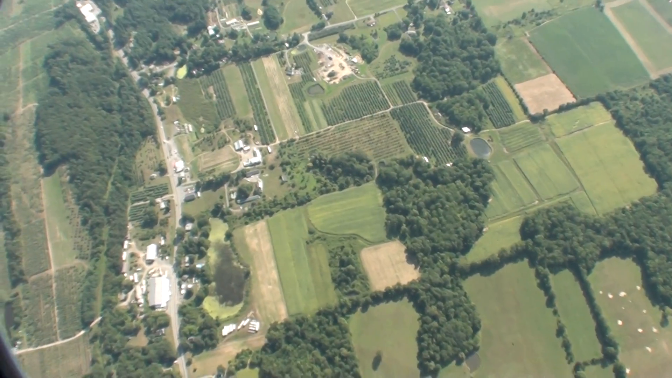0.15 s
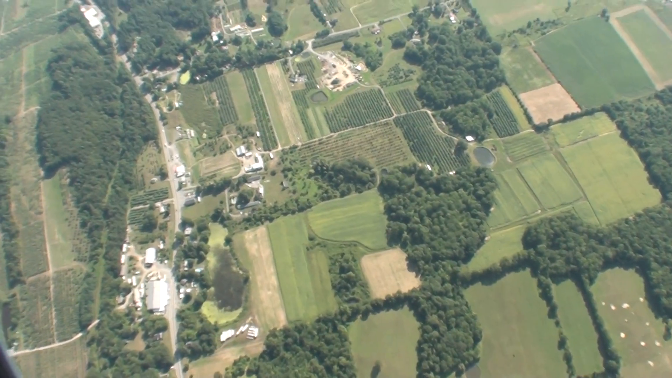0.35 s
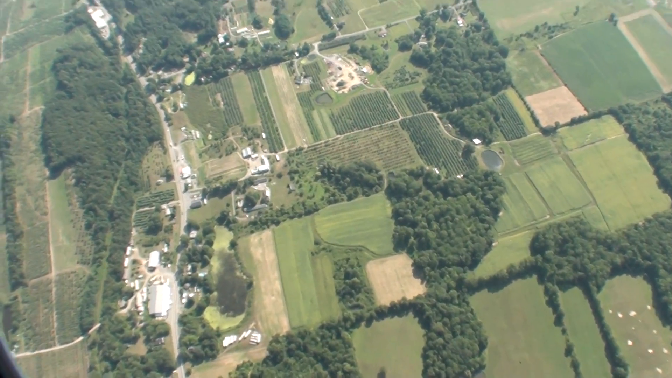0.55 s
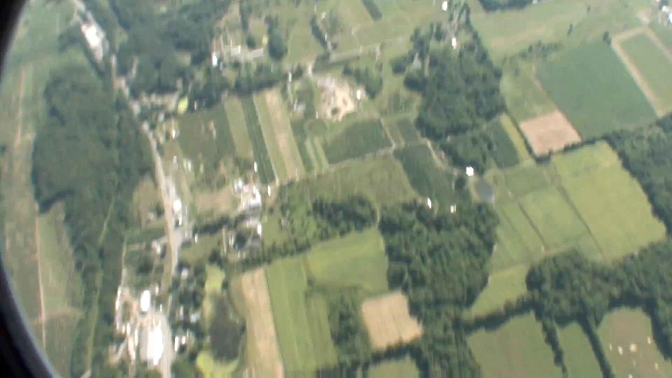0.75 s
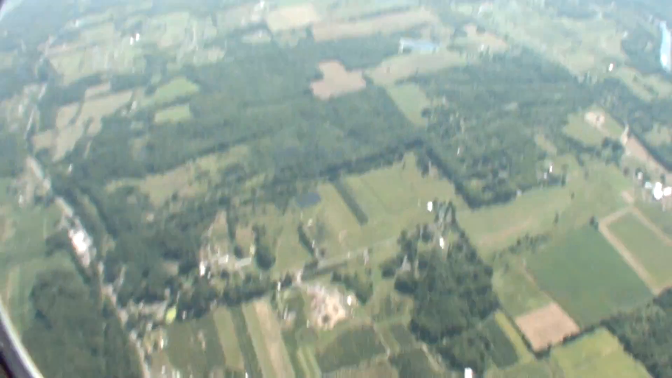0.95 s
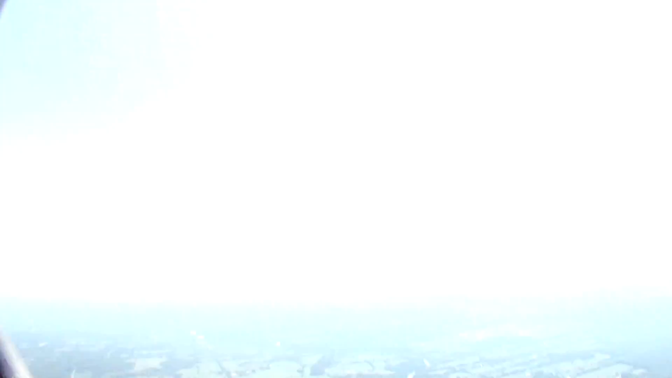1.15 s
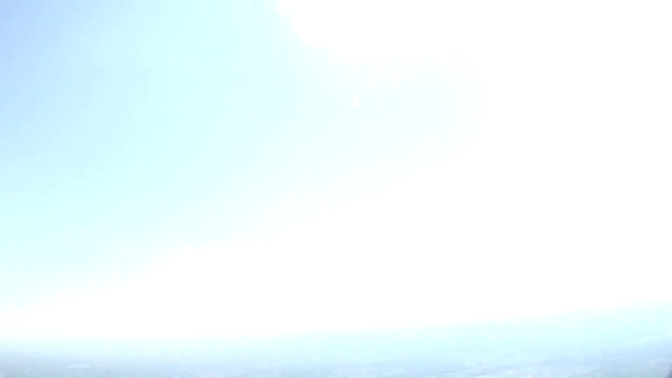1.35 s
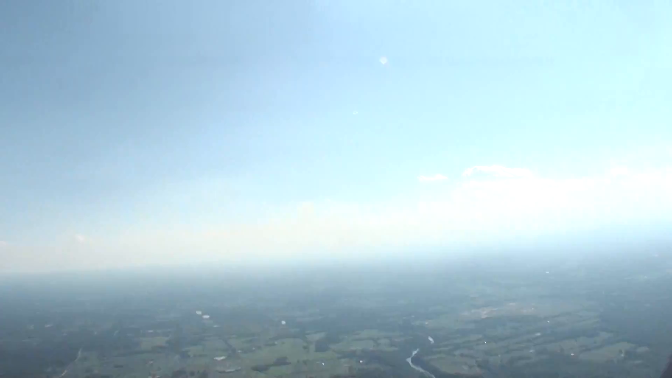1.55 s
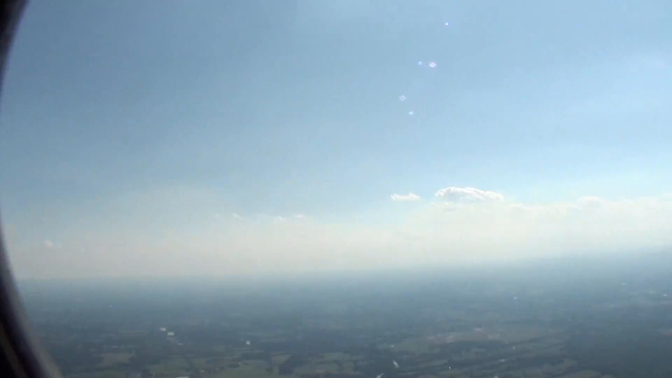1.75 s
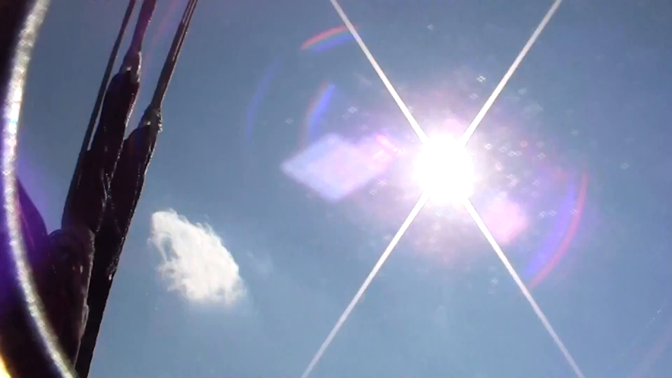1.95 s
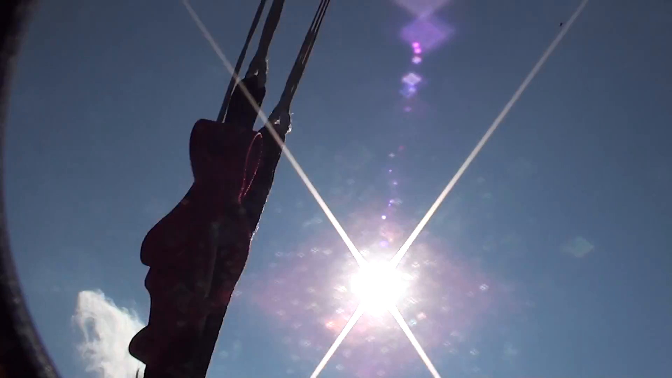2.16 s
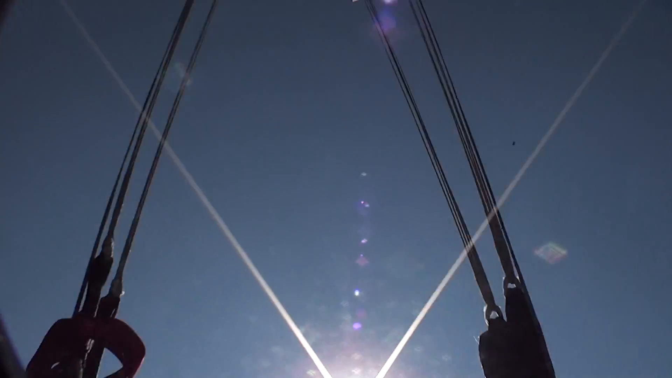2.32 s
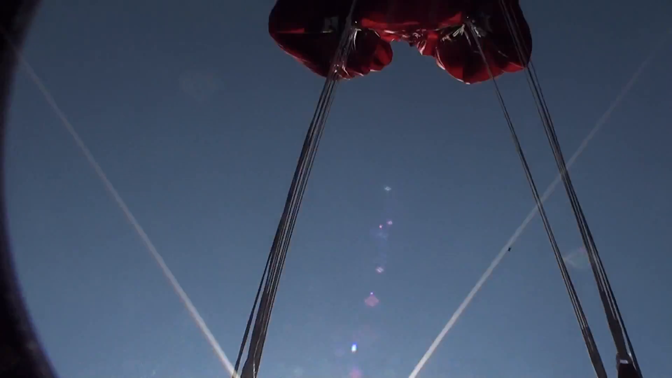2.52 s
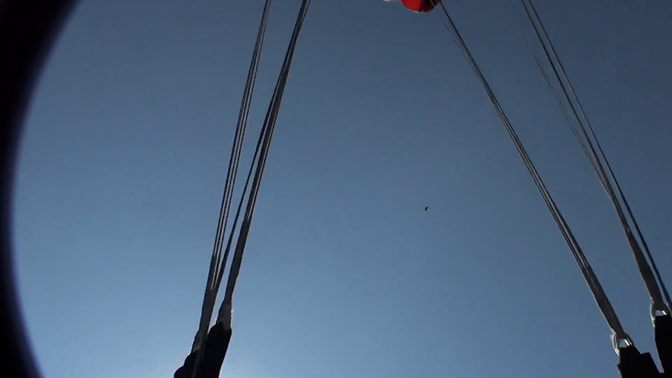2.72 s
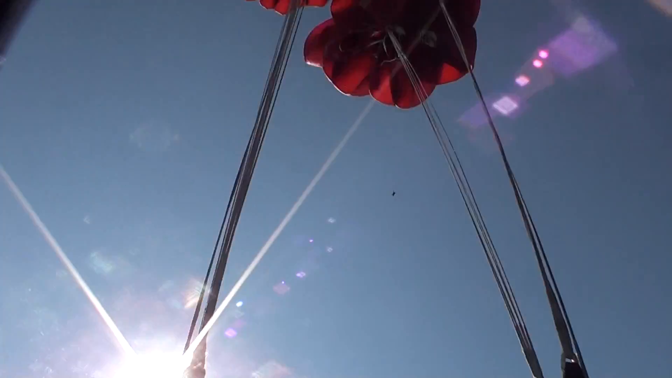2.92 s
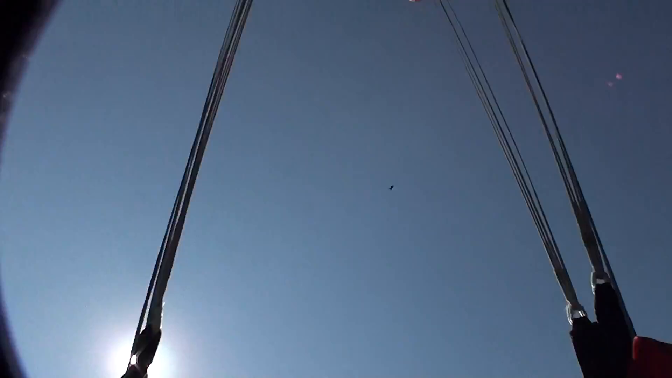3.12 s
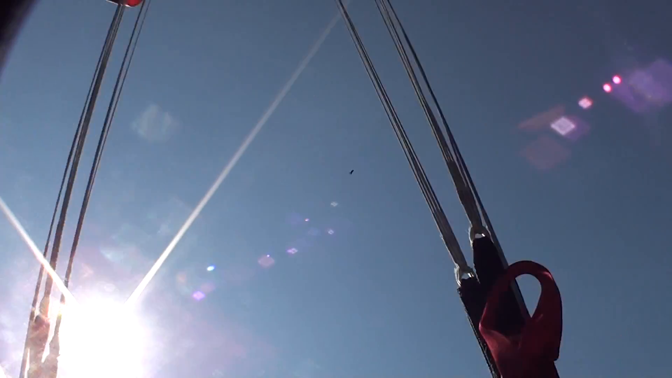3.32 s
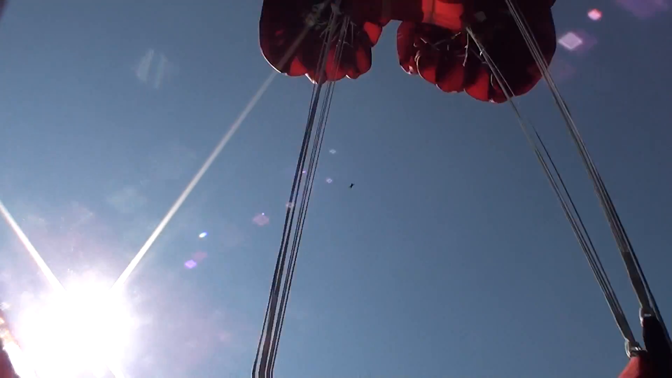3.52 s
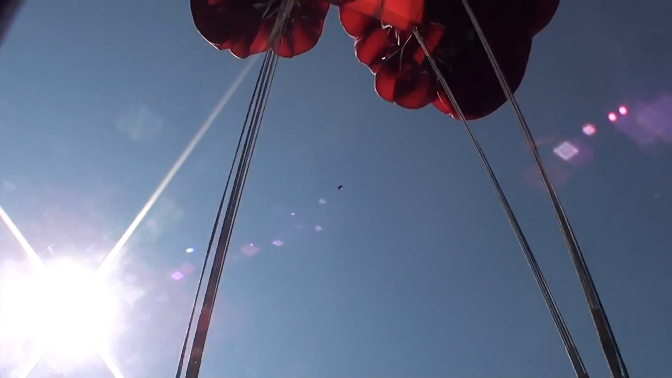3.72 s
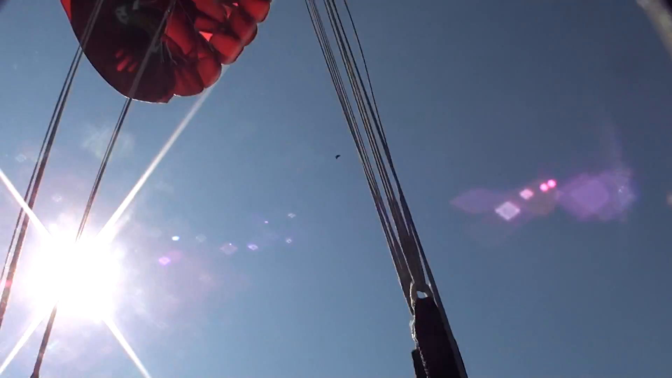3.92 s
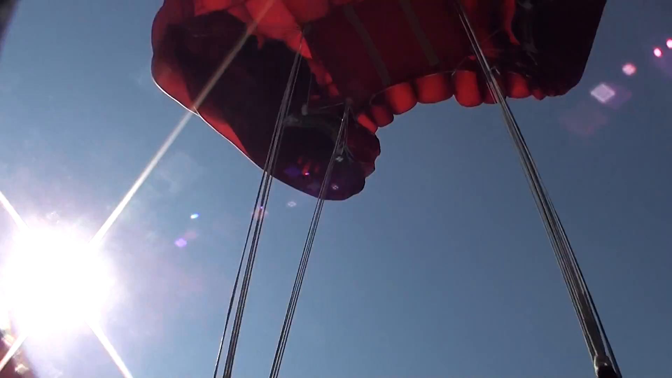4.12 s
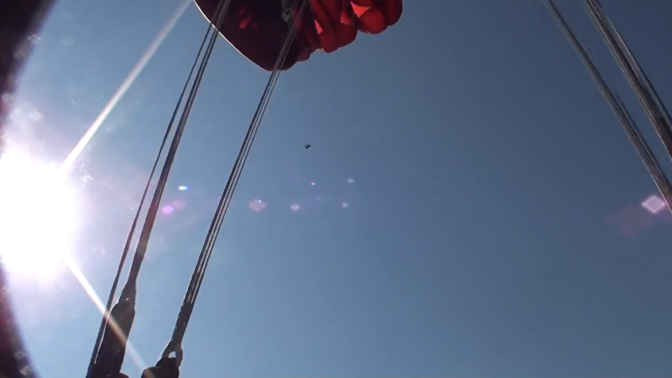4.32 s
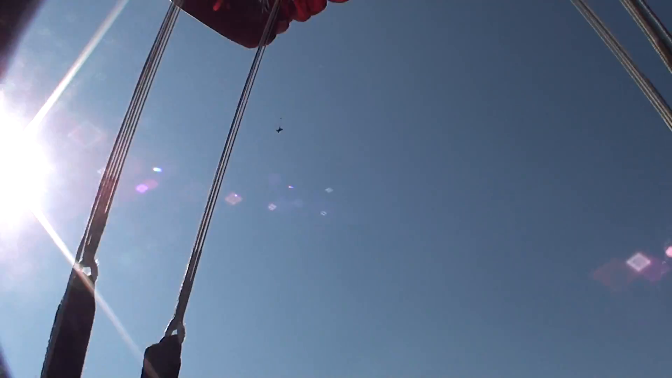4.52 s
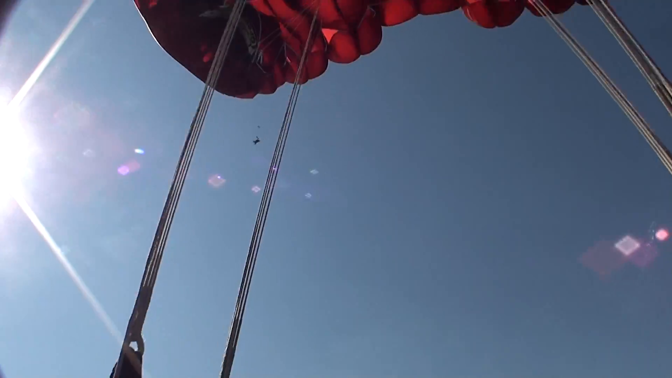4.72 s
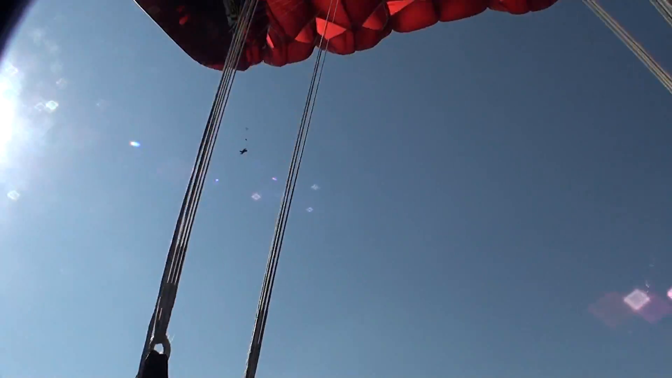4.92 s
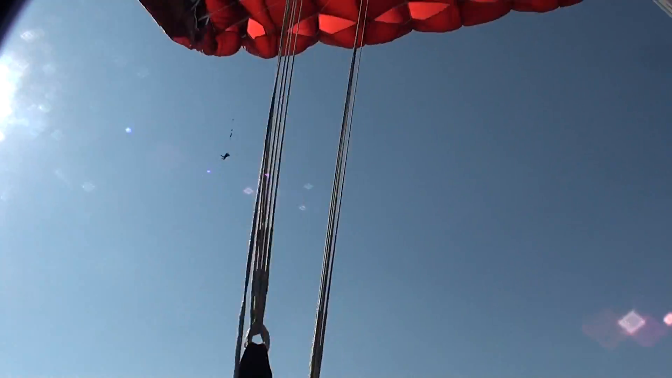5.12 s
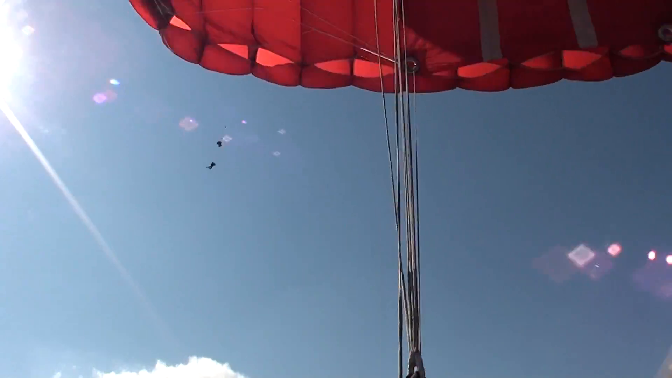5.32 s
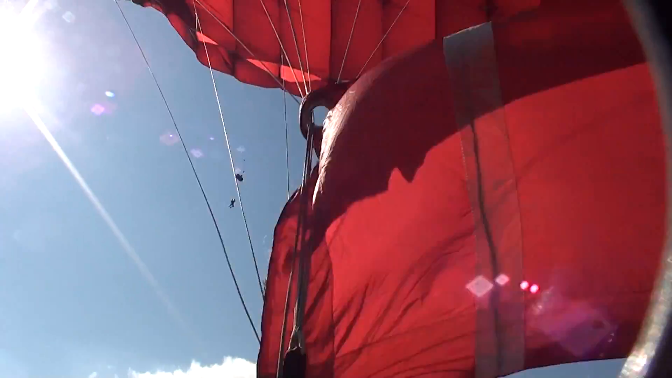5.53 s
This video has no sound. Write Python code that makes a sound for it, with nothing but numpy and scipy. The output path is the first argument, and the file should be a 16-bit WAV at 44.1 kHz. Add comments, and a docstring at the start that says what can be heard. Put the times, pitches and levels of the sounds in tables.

```python
"""Freefall and an opening parachute

Air roars and hisses over a skydiver's camera, then tears and spits as the body swings upright.
The opening parachute slows the fall, and the roar sinks to uneven thuds from eddies (swirls of air).
Overhead the canopy flutters and snaps, its lines tick, and the cloth slider rasps down them.
All this is heard through the camera's two microphone openings, called ports."""
import sys
import numpy as np
from scipy import signal
from scipy.fft import rfft, irfft, next_fast_len
from scipy.io import wavfile
from scipy.ndimage import map_coordinates

SR = 44100
rng = np.random.default_rng(int(sys.argv[2]) if len(sys.argv) > 2 else 0)


def bounce(signal):
    """Save signal as a 16-bit WAV file at the path given by the first command-line argument."""
    frames = np.transpose(np.atleast_2d(signal))
    limited = np.clip(frames, -1, 1)
    pcm = np.round(limited * 32767).astype(np.int16)
    wavfile.write(sys.argv[1], SR, pcm)


N = 245637

# Levels in these tables are relative: the functions add their own gains.
# Clear ticks of lines and seams. Each row: start in seconds, level in dB, length in seconds.
LINE_TICKS = [(2.108, -30, .003), (2.61, -27, .003), (2.625, -30, 0.0038), (2.665, -33, .004),
              (2.687, -31, .003), (3.312, -30, .002), (3.445, -26, 0.0033), (3.693, -28.5, .003)]
# Jerks of the slider. Each row: time in seconds, level in dB, half-width in seconds, pitch in Hz.
SLIDER_JERKS = [(2.43, -30, .007, 2000), (3.402, -31.5, 0.012, 2600), (4.088, -31.5, .018, 2600),
                (4.15, -32, .012, 2400), (5.262, -34.5, .003, 2400), (5.272, -31.5, .006, 2000),
                (5.406, -34, .006, 2700), (5.422, -36, .003, 2700), (5.452, -32.5, 0.015, 2000),
                (5.56, -31.5, 0.017, 2300)]
# The canopy's flutter, strongest as it billows open. Each row: time in seconds, level in dB.
FLUTTER_LEVELS = [(1.9, -37.5), (2.4, -38.5), (2.85, -41), (3.42, -39), (3.92, -38.5), (4.1, -32.5),
                  (4.44, -43.5), (4.82, -43.5), (5.17, -45), (5.57, -40)]
# Cloth snapping tight. Each row: start in seconds, snap in dB, sizzle in dB, length in seconds.
CLOTH_SNAPS = [(2.005, -23, -46, .013), (2.184, -22, -40, .008), (2.298, -22, -47, 0.021),
               (2.493, -24, -51, 0.0098), (2.803, -19, -45, .008), (2.927, -20.5, -51, .011),
               (3.262, -25, -56, 0.0086), (3.348, -23, -41.5, .005), (3.53, -30, -59, 0.011),
               (3.988, -17, -46, .006), (4.046, -14, -50, 0.01), (4.265, -16, -48, 0.014),
               (4.57, -22, -48, .007), (5.037, -22.5, -53.5, 0.019), (5.4495, -14, -54, 0.0054),
               (5.541, -17, -57, 0.007), (5.562, -16, -53, 0.0069)]
# Sharp spits of torn air. Each row: start in seconds, level in dB, length in seconds.
AIR_SPITS = [(1.057, -21, 0.0024), (1.081, -13, .001), (1.11, -19, 0.0017), (1.128, -21, .003),
             (1.133, -10.5, 0.0019), (1.152, -24, .003), (1.158, -26, .003), (1.169, -25, 0.0043),
             (1.18, -15.5, .005), (1.186, -23, .003), (1.211, -29, .002), (1.222, -33, 0.0027),
             (1.286, -28, .003), (1.305, -18.5, .0025), (1.317, -23, 0.0018), (1.42, -28, .003),
             (1.435, -17, 0.0022), (1.5515, -20, .004), (1.563, -19, .002), (1.569, -16, .002),
             (1.585, -21, .003), (1.597, -25, .003), (1.639, -17, .0018), (1.663, -24, .003),
             (1.672, -29, .002), (1.679, -21, .0013), (1.708, -35, .002), (1.737, -20, 0.0018),
             (1.791, -22, 0.0015), (1.81, -35, .003), (1.831, -29, .003), (1.844, -21, 0.0038),
             (1.863, -26, .005), (1.873, -25, .005), (1.896, -22, .004), (1.908, -27, .003)]
# Big swirls passing by. Each row: time in seconds, level in dB, pitch in Hz, half-width in seconds.
SWIRL_THROBS = [(1.263, -18, 106, 0.0099), (1.446, -24, 155, 0.019), (1.55, -15.5, 177, 0.0067),
                (1.724, -13, 126, 0.012), (1.852, -11, 140, 0.013), (2.419, -12.5, 120, 0.014),
                (2.642, -17, 117, 0.017), (2.675, -16, 142, 0.0063), (2.704, -16, 136, 0.0098),
                (2.764, -11.5, 133, 0.0091), (2.798, -16, 170, 0.0084), (2.881, -11, 116, 0.013),
                (3.041, -18.5, 135, 0.0077), (3.192, -15.5, 124, 0.0083), (3.284, -18, 85, .009),
                (3.504, -17, 84, 0.015), (3.567, -17, 101, 0.0069), (3.886, -22, 104, 0.015),
                (3.979, -21, 106, 0.02), (4.119, -21, 132, .014), (4.443, -35, 139, 0.019),
                (4.589, -28, 126, .009), (4.986, -28, 122, 0.0088), (5.378, -30, 137, 0.0099),
                (5.5, -30, 142, .013)]
# Eddies hitting the ports. Each row: start in seconds, thud in dB, crackle in dB, length in seconds.
EDDY_HITS = [(1.122, -4.5, -13.5, 0.0056), (1.155, -3, -20, .008), (1.178, -4, -9, 0.0083),
             (1.208, -5, -19, .004), (1.31, 2.5, -14.5, 0.0094), (1.545, -8, -13, 0.015),
             (1.64, -1, -14, 0.0068), (1.666, -6.5, -19.5, 0.011), (1.706, -4, -31, 0.0046),
             (1.737, -9, -15, 0.0053), (1.807, -3, -18.5, .006), (1.841, -4, -21, .006),
             (1.856, -3.5, -16.5, 0.015), (1.895, -10, -19, 0.0075), (1.909, -11, -19, 0.009),
             (2.009, -7, -23.5, 0.0072), (2.057, -9.5, -18, 0.0062), (2.095, -7, -37, 0.0053),
             (2.167, -9, -28, 0.008), (2.295, -13, -26.5, .009), (2.424, -15, -25.5, 0.01),
             (2.497, -4, -27, 0.0062), (2.532, -11, -31, 0.013), (2.794, -6, -37, 0.0061),
             (2.805, -2.5, -27, 0.0072), (2.853, -9.5, -41, 0.012), (3.033, -17, -34, .007),
             (3.07, -12.5, -23, 0.0083), (3.189, -8, -25.5, 0.0043), (3.206, -17, -35, 0.0054),
             (3.256, -13, -28, 0.01), (3.35, -13, -34, 0.0079), (3.448, -11.5, -35, .007),
             (3.535, -11, -30, 0.0092), (3.579, -9, -38, 0.0048), (3.714, -11.5, -36, 0.011),
             (4.11, -13, -37, 0.011), (4.218, -16.5, -29, 0.0091), (4.415, -12, -35, 0.0062),
             (4.426, -17, -32.5, 0.0087), (4.552, -19, -31, 0.0099), (4.571, -20, -32.5, 0.012),
             (4.658, -17, -29.5, 0.012), (4.708, -22, -35.5, 0.02), (4.783, -13, -30, 0.0037),
             (4.8628, -13, -29.5, 0.01), (4.942, -15, -35, 0.0086), (5.082, -17, -42, 0.0057),
             (5.142, -17, -37, 0.012), (5.325, -10.5, -44, 0.0027), (5.457, -13.5, -30, 0.0069)]
# The airflow, weakening as the parachute brakes. Each row: time in seconds, level in dB.
FLOW_LEVELS = [(0, -12), (.35, -10), (.6, -12.5), (1.05, -11), (1.26, -16), (1.9, -17.5), (1.97, -25),
               (2.12, -24), (2.28, -25), (2.6, -22), (3.55, -27.5), (3.82, -28), (4.3, -29), (4.53, -36),
               (4.8, -30.5), (5.07, -32.5), (5.21, -38.5), (5.57, -32.5)]
# Gusts and lulls as the body swings.
# Each row: time in seconds, roar change in dB, rumble change in dB, half-width in seconds.
GUSTS = [(1.175, 6.5, 2.5, 0.013), (1.285, 7, -2, 0.005), (1.43, 4, 0.5, 0.016), (1.6, 3.5, 1, 0.11),
         (1.85, -0.5, -1, 0.055), (1.975, -4, -2, 0.021), (2.235, -2, -3, 0.0085), (2.48, 4, 6.5, 0.053),
         (2.7, 2.5, 4.5, 0.058), (2.85, -0.5, 4, 0.085), (3.23, 4.5, 0, 0.042), (3.55, 0, -0.5, 0.049),
         (3.79, -4.5, -9, 0.018), (3.97, 4, 6, 0.036), (4.1, 11, 1.5, 0.038), (4.33, -1.5, -10, 0.028),
         (4.91, -8, -8, 0.013), (5.41, -3.5, -4, .016)]
# Instants when the air clings to the camera. Each row: time in seconds, dip in dB, half-width in seconds.
CALMS = [(1.069, -6, 0.0029), (1.1, -9, 0.0052), (1.118, -13, 0.0036), (1.145, -6, .006),
         (1.342, -2.5, 0.0082), (1.61, -8, 0.0038), (1.696, -5.5, 0.0091), (1.765, -3, 0.0093),
         (1.822, -8.5, 0.0036)]
# The hiss at full speed. Each row: time in seconds, level in dB.
HISS_LEVELS = [(0, -16.5), (.45, -16.5), (.68, -19), (.82, -17)]
# The wind's stereo width. Each row: time in seconds, gain of the left-right difference in dB.
WIND_WIDTH = [(0, 0.5), (1.2, 0.5), (2.2, 2.5), (3.5, 2.5), (5.4, -2)]

# The tone of each noise, from bass to treble. Each row: frequency in Hz, level in dB.
CLOTH_TONE = [(300, -39), (590, -14), (1000, -2), (1460, 0.5), (1800, -3.5), (2600, -3), (3250, -6.5),
              (4700, -19), (6100, -17.5), (7650, -24), (9900, -35.5), (11200, -44.5), (14400, -46),
              (16000, -49)]
SLIDER_TONE = [(300, -41), (600, 4), (900, -8), (1500, -1), (2100, -3), (2700, -1.5), (3400, -5),
               (4800, -28), (7000, -16), (10000, -33), (16000, -51)]
SIZZLE_TONE = [(2500, -29), (5000, 4), (6500, 4), (8000, -5), (11000, -22), (16000, -31)]
SPIT_TONE = [(800, -18), (2500, 7), (5000, 0), (9000, -9.5), (16000, -25)]
WHOOSH_TONE = [(200, -35), (450, -13), (850, -4), (1200, -7), (2000, -16.5), (5000, -38), (16000, -54)]
THUD_TONE = [(25, -23), (90, 4), (200, 2.5), (400, 1.5), (700, -3), (1100, -20), (2500, -51), (8000, -120)]
CRACKLE_TONE = [(300, 3), (900, 7.5), (1500, 1), (3000, -9.5), (4500, -19), (7000, -25), (10000, -42.5),
                (16000, -58)]
HISS_TONE = [(590, -42), (1000, -1.5), (1080, -3), (1400, -4), (1820, -2.5), (2140, -7), (3480, -12.5),
             (7560, -14.5), (14600, -29.5), (15800, -33)]
TEAR_TONE = [(590, -10.5), (1000, -1.5), (1290, 2.5), (1700, 0.5), (1870, -4), (2140, -2), (2730, -5),
             (4490, -17.5), (7050, -22), (15800, -61)]
FIZZ_TONE = [(3000, -20), (9000, 0), (16000, -7)]
FAST_RUMBLE_TONE = [(15, -46), (45, -17), (70, -8.5), (105, -1), (150, -2.5), (220, -10), (370, -56),
                    (900, -120)]
SLOW_RUMBLE_TONE = [(15, -39), (25, -20), (45, -6.5), (80, 1.5), (120, -1.5), (160, -1), (230, -8.5),
                    (400, -74), (900, -120)]
FAST_ROAR_TONE = [(30, -55), (90, -34), (150, -2.5), (220, -4), (300, 0), (450, -2.1), (680, -3), (900, -8),
                  (1100, -15.5), (1500, -27), (3500, -120)]
UPRIGHT_ROAR_TONE = [(30, -59), (90, -34), (150, -4.5), (220, -0.5), (330, -2), (520, -4), (760, -7),
                     (1100, -13), (1500, -36), (3500, -120)]
SLOW_ROAR_TONE = [(30, -60), (90, -28), (150, -9), (220, -5.5), (360, -5.5), (540, -10.5), (700, -11.5),
                  (1000, -22), (1400, -33), (2000, -33.5), (4500, -120)]

# How alike fast air, slow air and cloth sound at the two ports.
# Each row: frequency in Hz, likeness from 0 to 1, the left port's phase lead in radians.
FAST_ALIKE = [(80, 1, -0.19), (260, 0.72, -0.56), (630, 0.51, 0.074), (1000, .12, 1.9), (1480, 0.27, 1.9),
              (2000, 0.42, 1.1), (2700, 0.43, 0.42), (4500, 0.93, 0.98), (8000, 0.85, 0.037),
              (11600, 1, 0.1)]
SLOW_ALIKE = [(40, 0.94, .03), (90, 0.94, .05), (170, .85, 0.18), (373, 0.46, 1.07), (587, 0.47, 1.16),
              (906, 0.36, 2.5), (1300, 0.72, 1.72), (2500, 0.52, 0.59), (5000, 0.86, .38),
              (12000, 0.94, .05)]
CLOTH_ALIKE = [(900, 1, .5), (1300, 0.76, .35), (2200, 0.95, .06), (3500, 0.85, .1), (4600, 0.74, .35),
               (6000, 0.97, .12), (12000, 0.94, .02)]
# How much louder the left port is than the right. Each row: frequency in Hz, difference in dB.
WIND_BALANCE = [(100, -.7), (380, 0), (700, -2), (1300, -0.5), (2400, -1.5), (4400, 0)]
CLOTH_BALANCE = [(1200, 0.5), (2400, -6.5), (4700, -1), (7000, -0.5), (11000, -1)]

SWEEP_START_S, SWEEP_END_S = 0.814, 1.05  # the air sweeps across the ports once
TIME = np.arange(N) / SR
FFT_SIZE = next_fast_len(N + SR // 4)
FREQS = np.fft.rfftfreq(FFT_SIZE, 1 / SR)


def amp(db):
    """Turn decibels into a gain."""
    return 10 ** (np.asarray(db) / 20)


def unit(x):
    """Scale a signal to an average power of 1."""
    return x / np.sqrt(np.mean(x ** 2) + 1e-20)


def over_frequency(rows):
    """Join a table's points into one curve per value column, on a log frequency scale."""
    hz, *columns = np.transpose(rows)
    return np.squeeze([np.interp(np.log(FREQS + 1), np.log(hz + 1), c) for c in columns])


def over_time(rows):
    """Join (time, value) points with straight lines."""
    return np.interp(TIME, *np.transpose(rows))


def wobble(rate):
    """A smooth random curve through `rate` points a second."""
    return map_coordinates(rng.standard_normal(N // 8), [np.arange(N) * rate / SR], mode="wrap")


def after(time, fade):
    """A smooth rise from 0 to 1 around the given time."""
    return (1 + np.tanh((TIME - time) / fade)) / 2


def swell(time, width):
    """A bell-shaped rise and fall of height 1 around the given time."""
    return np.exp(-((TIME - time) / width) ** 2 / 2)


def sweep():
    """A curve from 0 to 1 and back as the air sweeps across the ports."""
    return after(SWEEP_START_S, fade=0.05) * (1 - after(SWEEP_END_S, fade=0.006))


def blend(first, second, share):
    """Mix two noises, giving the second this share of the power."""
    return np.sqrt(1 - share) * first + np.sqrt(share) * second


def filtered(x, gains):
    """Apply one gain to each frequency in FREQS."""
    return irfft(rfft(x, FFT_SIZE) * gains, FFT_SIZE)[..., :N]


def rush(tone, alike, flicker_db):
    """Rushing stereo noise with the given tone, made rough by a flickering level."""
    likeness, lead = over_frequency(alike)
    spread = np.arccos(np.clip(likeness, -1, 1)) / 2
    rough = rfft(rng.standard_normal((2, N)) * amp(flicker_db), FFT_SIZE)
    mid, side = rough * amp(over_frequency(tone)) * [np.cos(spread), np.sin(spread)]
    ahead = np.exp(.5j * lead)
    left_right = np.array([(mid + side) * ahead, (mid - side) / ahead])
    return unit(irfft(left_right, FFT_SIZE)[:, :N])


def bursts(noise, starts, levels_db, lengths, attack_s=0.00063, tail_db=-14):
    """Cut noise into puffs that rise quickly and die away with a faint tail."""
    out = np.zeros((2, N))
    for start, db, length in np.broadcast(starts, levels_db, lengths):
        span = slice(int(start * SR), int(start * SR) + SR // 5)
        t = np.arange(noise[:, span].shape[1]) / SR
        tail = amp(tail_db) * np.exp(-t / (1.4 * length))
        fall = np.maximum(np.exp(-(t / length) ** 2 / 2), tail)
        shape = (1 - np.exp(-t / attack_s)) * fall
        out[:, span] += amp(db) * np.sqrt(np.mean(shape ** 2)) * unit(shape * noise[:, span])
    return out


def shower(start_s, end_s, per_second, level_db, spread_db):
    """Pick random times and levels for a run of small sounds."""
    gaps, strengths = rng.random((200, 2)).T
    times = start_s + np.cumsum(2 * gaps) / per_second
    db = level_db + spread_db * np.sqrt(3) * (2 * strengths - 1)
    return times[times < end_s], db[times < end_s]


def ports(x, balance):
    """The two microphone ports differ a little in level."""
    return filtered(x, amp(np.outer([.5, -.5], over_frequency(balance))))


def line_ticks():
    """Lines and seams tick as the canopy unfolds: a few clear ticks among many faint ones."""
    grains = rush(CLOTH_TONE, CLOTH_ALIKE, 4 * wobble(900))
    faint = shower(start_s=1.95, end_s=3.6, per_second=12, level_db=-40, spread_db=8.5)
    return bursts(grains, *np.transpose(LINE_TICKS)) + bursts(grains, *faint, lengths=0.0016)


def slider(ring_db=6.5, ring_octaves=0.22):
    """The cloth slider rubs down the lines in jerks, each ringing at its own pitch."""
    rub = rush(SLIDER_TONE, CLOTH_ALIKE, 1.2 * wobble(70) + 2.4 * wobble(500))
    out = np.zeros((2, N))
    for time, db, width, pitch in SLIDER_JERKS:
        octaves_away = np.log2((FREQS + 1) / pitch)
        ring = amp(ring_db * np.exp(-(octaves_away / ring_octaves) ** 2 / 2))
        out += amp(db) * swell(time, width) * unit(filtered(rub, ring))
    return out


def canopy():
    """Cloth flutters overhead, nearly alike at both ports; now and then a panel snaps tight."""
    starts, snap_db, sizzle_db, lengths = np.transpose(CLOTH_SNAPS)
    rustle = rush(CLOTH_TONE, CLOTH_ALIKE, 1.04 * wobble(60) + 1.35 * wobble(400))
    flutter = amp(over_time(FLUTTER_LEVELS) + 3) * np.sqrt(after(1.93, fade=0.0081)) * rustle
    snaps = bursts(rush(CLOTH_TONE, CLOTH_ALIKE, 4.2 * wobble(500)), starts, snap_db - 13.5, lengths)
    sizzle = bursts(rush(SIZZLE_TONE, CLOTH_ALIKE, 3 * wobble(900)), starts, sizzle_db, lengths)
    return flutter + snaps + sizzle


def growl(pitch_hz=309.8, level_db=-20):
    """At full speed the camera sheds swirls so fast that they growl, at a pitch that never settles."""
    hz = pitch_hz * np.exp(.15 * wobble(22) + 0.1184 * wobble(300))
    flicker = amp(3.5 * wobble(28.1) + 1.9 * wobble(131.4))
    tone = unit(flicker * np.sin(2 * np.pi * np.cumsum(hz) / SR))
    return amp(level_db) * np.sqrt(1 - after(SWEEP_START_S, fade=.07)) * tone


def spits():
    """The hardest gusts spit bright grains a few milliseconds long, with fainter ones between."""
    starts, db, lengths = np.transpose(AIR_SPITS)
    grains = rush(SPIT_TONE, FAST_ALIKE, 3.8 * wobble(2500))
    faint = shower(start_s=1.05, end_s=1.5, per_second=69, level_db=-37, spread_db=1)
    return bursts(grains, starts, db - 6, lengths, tail_db=-16) + bursts(grains, *faint, lengths=0.003)


def throbs():
    """Each big swirl passing the camera throbs for a few unsteady cycles, alike at both ports."""
    drift = 0.99 * wobble(110)  # radians
    out = np.zeros(N)
    for (time, db, hz, width), phase in zip(SWIRL_THROBS, rng.random(len(SWIRL_THROBS))):
        tone = np.sin(2 * np.pi * (hz * (TIME - time) + phase) + drift)
        out += amp(db - 1) * swell(time, width) * tone
    return out


def eddies(swirl, core_delay_s=0.0052, core_width_s=0.00099):
    """Single large eddies thud and crackle at the ports as they break up, then suck at them as each core
    passes."""
    starts, thud_db, crackle_db, lengths = np.transpose(EDDY_HITS)
    thud_db = thud_db - 7.5
    low_noise = rush(THUD_TONE, SLOW_ALIKE, 1.4 * swirl + 2.2 * wobble(160))
    bright_noise = rush(CRACKLE_TONE, SLOW_ALIKE, 5 * wobble(600))
    thud = bursts(low_noise, starts, thud_db, lengths, attack_s=.0011)
    crackle = bursts(bright_noise, starts, crackle_db + 3.5, lengths, attack_s=.0011)
    # The pressure dips at each eddy's core, just after its edge arrives.
    cores = np.bincount(((starts + core_delay_s) * SR).astype(int), amp(thud_db), N)[:N]
    offset = np.arange(-SR // 20, SR // 20) / (SR * core_width_s)
    dip = (offset ** 2 - 1) * np.exp(-offset ** 2 / 2)
    return thud + crackle + signal.fftconvolve(cores, dip, "same")


def whoosh(swirl, level_db=-12.5):
    """Sweeping across the ports, the air gives a higher roar topped with fizz."""
    body = rush(WHOOSH_TONE, FAST_ALIKE, 0.49 * swirl)
    fizz = amp(-12.5) * rush(SPIT_TONE, FAST_ALIKE, 1.6 * swirl + 2.4 * wobble(1200))
    return amp(level_db) * sweep() * (body + fizz)


def wind_levels(open_s=3.5, fade_db_per_s=2, ceiling_db=-21):
    """Roar, rumble and tearing levels in dB. All follow flow and gusts; calms dip roar and tearing."""
    flow_db = over_time(FLOW_LEVELS)
    gust_db = sum(db * swell(time, width) for time, db, _, width in GUSTS)
    low_gust_db = sum(db * swell(time, width) for time, _, db, width in GUSTS)
    calm_db = sum(db * swell(time, width) for time, db, width in CALMS)
    roar_db = flow_db + gust_db + .4 * calm_db
    # The wake (churned air behind the camera) dies away once the canopy is open.
    wake_db = 1.16 * flow_db + 7 - fade_db_per_s * np.maximum(TIME - open_s, 0)
    capped_db = -10 * np.log10(amp(wake_db) ** -2 + amp(ceiling_db) ** -2)
    tear_db = flow_db - 9.5 + 0.65 * gust_db + 3 * sweep() + calm_db
    return roar_db, capped_db + low_gust_db, tear_db


def hiss_and_tear(swirl, tear_db):
    """Air skims the ports with a hiss; as the camera tilts it breaks away, tears and fizzes."""
    tilted, ragged, braked = after(0.818, fade=0.0064), after(0.89, fade=0.019), after(1.94, fade=0.01)
    hiss = amp(over_time(HISS_LEVELS)) * rush(HISS_TONE, FAST_ALIKE, 0.93 * swirl + 2.26 * wobble(700))
    tear = rush(TEAR_TONE, SLOW_ALIKE, (0.81 + 1.3 * ragged) * swirl + 2 * wobble(700))
    fizz = amp(-28.5) * rush(FIZZ_TONE, FAST_ALIKE, 2 * swirl + 2 * wobble(1500))
    return blend(hiss, amp(tear_db) * np.sqrt(1 - braked) * (tear + fizz), tilted)


def rumble(swirl, level_db):
    """The largest eddies rumble; slower air sheds them at a lower pitch."""
    fast = rush(FAST_RUMBLE_TONE, SLOW_ALIKE, 2.3 * swirl)
    slow = rush(SLOW_RUMBLE_TONE, SLOW_ALIKE, swirl)
    return amp(level_db) * blend(fast, slow, after(1.55, fade=0.53))


def roar(swirl, level_db):
    """Air pounds the camera: a dense roar at full speed, deeper and lumpier once the fall slows."""
    fast = amp(0.9) * rush(FAST_ROAR_TONE, FAST_ALIKE, 0.64 * swirl + 1.7 * wobble(200))
    upright = amp(-0.6) * rush(UPRIGHT_ROAR_TONE, SLOW_ALIKE, 3.1 * swirl)
    slow = amp(-0.06) * rush(SLOW_ROAR_TONE, SLOW_ALIKE, 2.64 * swirl)
    braking = blend(upright, slow, after(1.99, fade=0.2))
    return amp(level_db) * blend(fast, braking, after(1.06, fade=0.071))


def scene():
    """Mix wind and cloth. Most wind layers flicker with one shared swirl of large and small eddies."""
    swirl = unit(0.28 * wobble(35) + 1.04 * wobble(100) + 1.34 * wobble(320))
    roar_db, rumble_db, tear_db = wind_levels()
    wind = roar(swirl, roar_db) + rumble(swirl, rumble_db) + hiss_and_tear(swirl, tear_db)
    wind += whoosh(swirl) + eddies(swirl) + throbs() + growl() + spits()
    mid = wind.mean(axis=0)
    wind = mid + amp(over_time(WIND_WIDTH)) * (wind - mid)
    cloth = canopy() + slider() + line_ticks()
    return ports(wind, WIND_BALANCE) + ports(cloth, CLOTH_BALANCE)


def round_off(x, limit):
    """Gently squash peaks so they stay under the limit."""
    return x / (1 + np.abs(x / limit) ** 6) ** (1 / 6)


def record(dry, top_hz=15950):
    """The close-set microphones overload together on big peaks; the camera cuts the highest treble."""
    mid = dry.mean(axis=0)
    pair = round_off(mid, limit=0.69) + (dry - mid)
    return filtered(round_off(pair, limit=0.86), FREQS < top_hz)


dry = scene()
out = record(dry)
bounce(out)
```